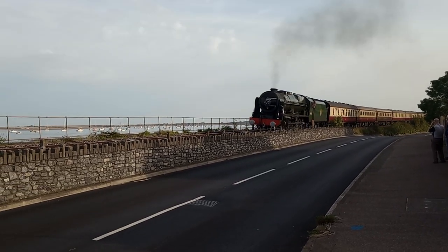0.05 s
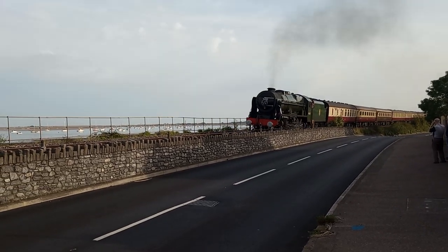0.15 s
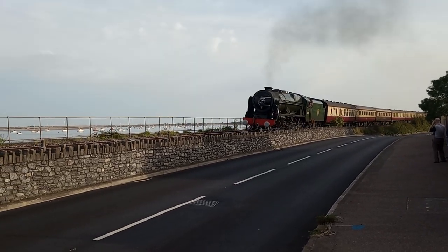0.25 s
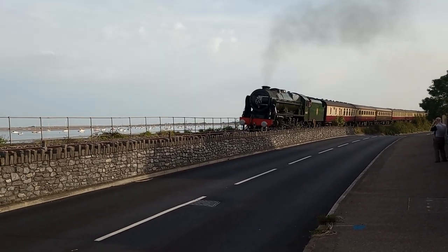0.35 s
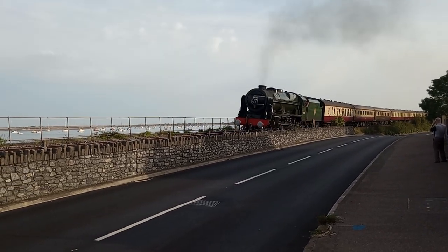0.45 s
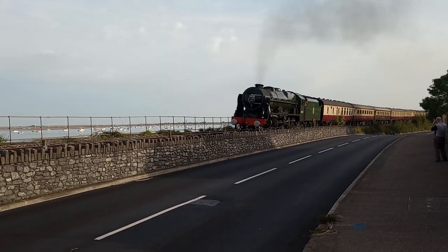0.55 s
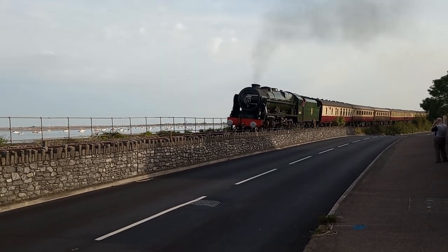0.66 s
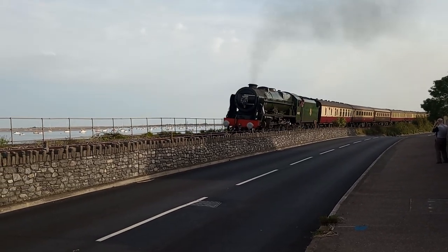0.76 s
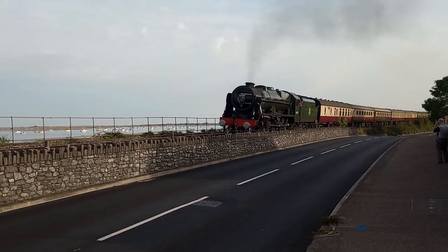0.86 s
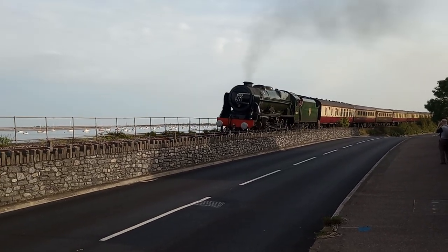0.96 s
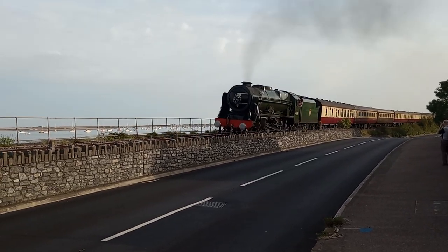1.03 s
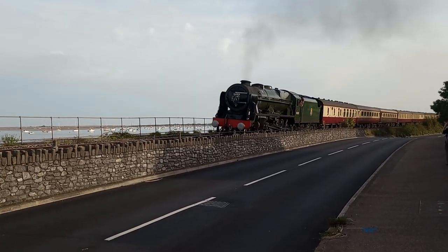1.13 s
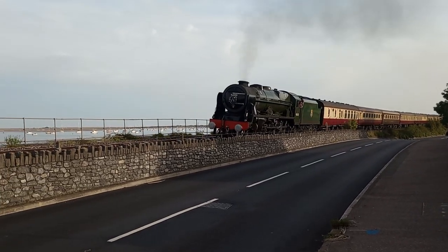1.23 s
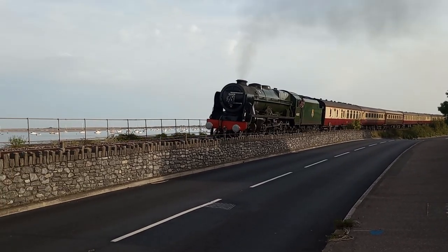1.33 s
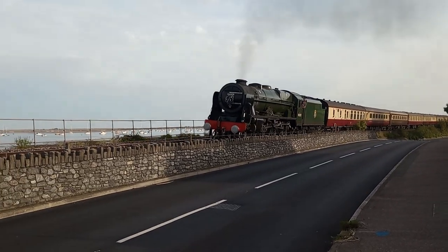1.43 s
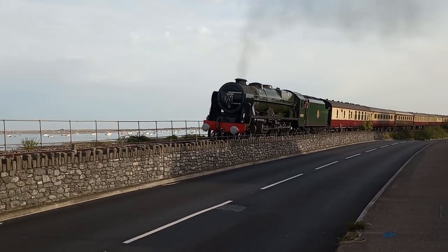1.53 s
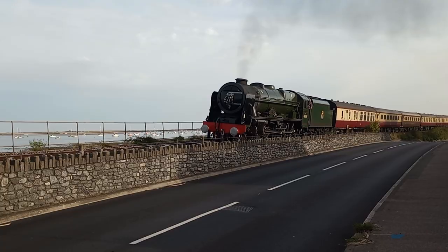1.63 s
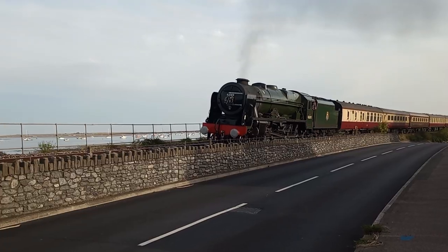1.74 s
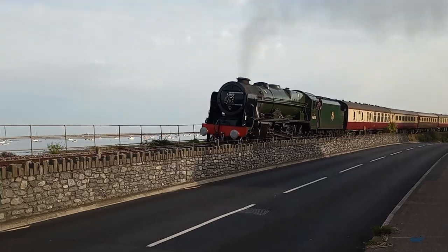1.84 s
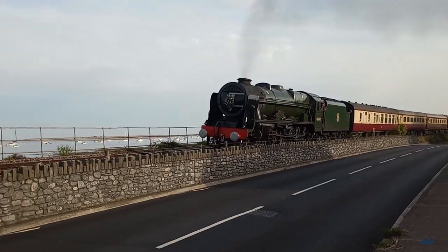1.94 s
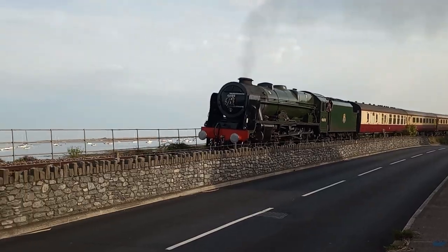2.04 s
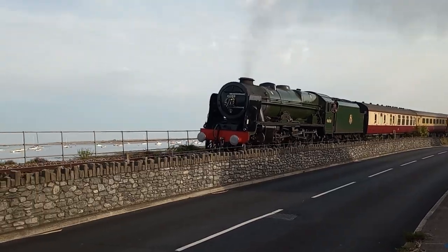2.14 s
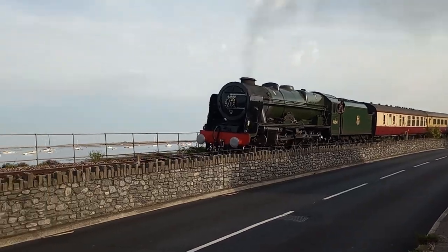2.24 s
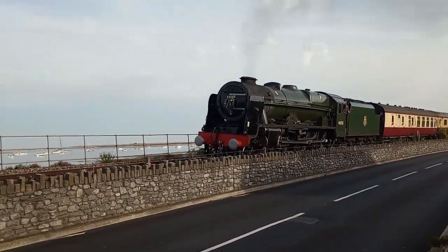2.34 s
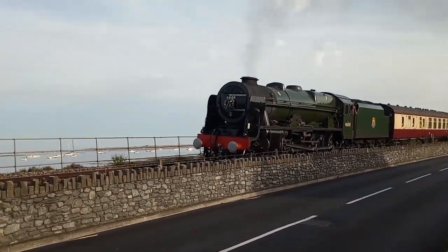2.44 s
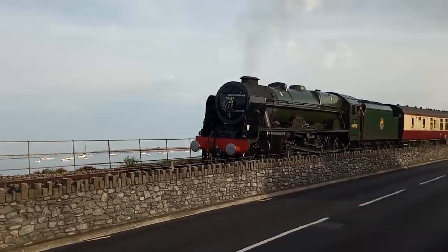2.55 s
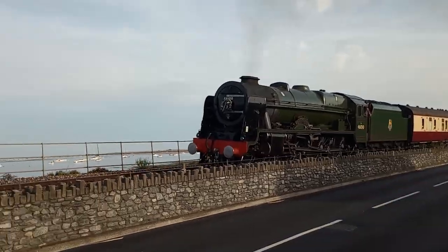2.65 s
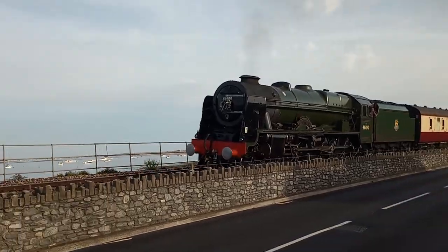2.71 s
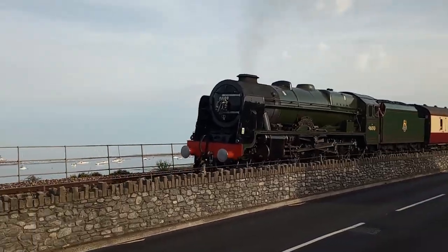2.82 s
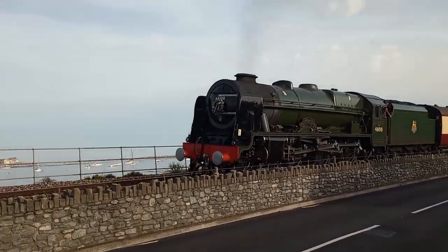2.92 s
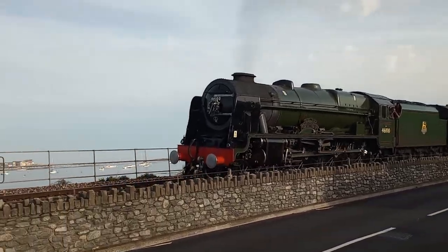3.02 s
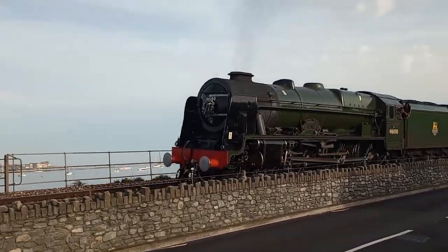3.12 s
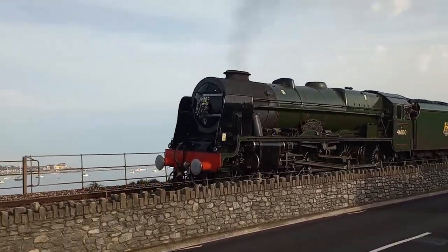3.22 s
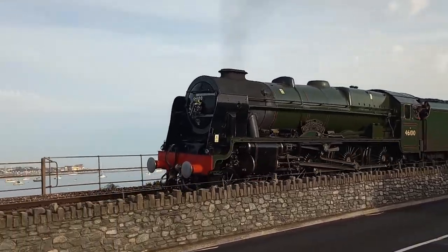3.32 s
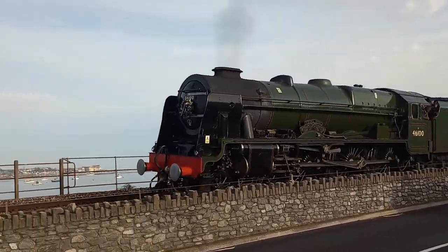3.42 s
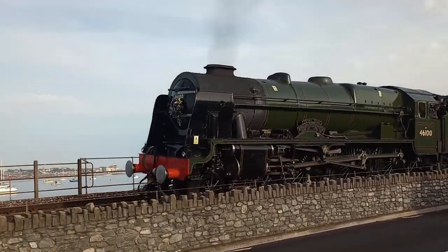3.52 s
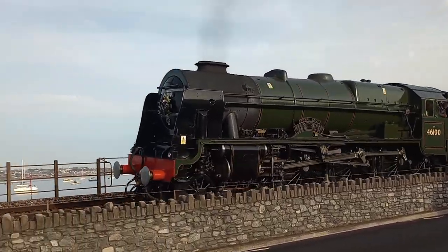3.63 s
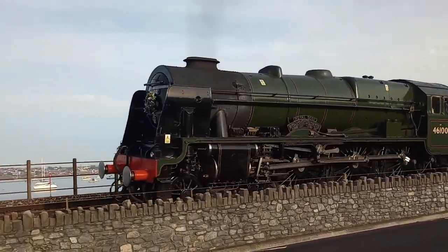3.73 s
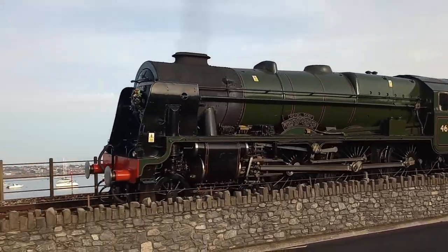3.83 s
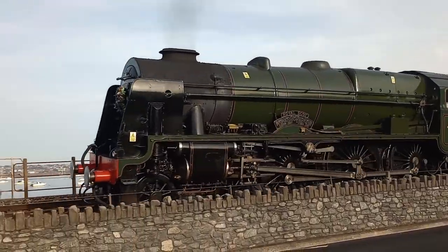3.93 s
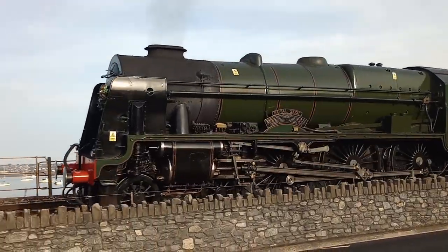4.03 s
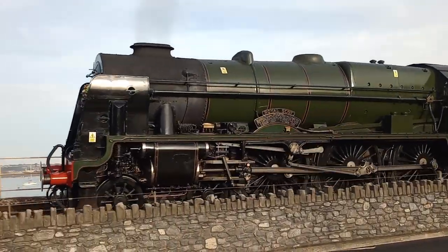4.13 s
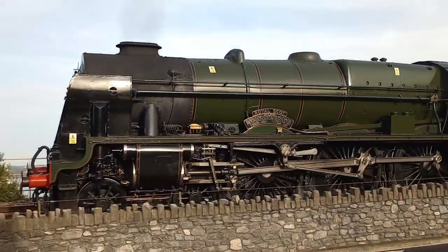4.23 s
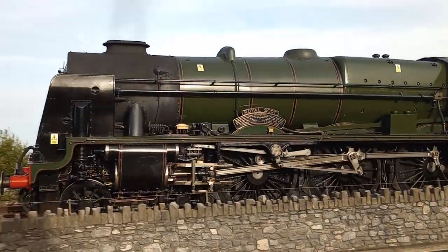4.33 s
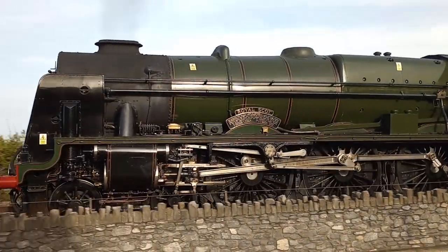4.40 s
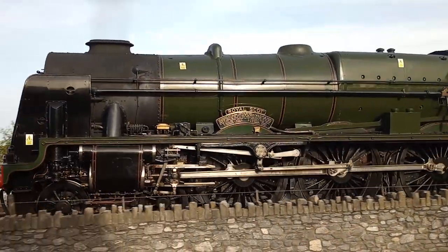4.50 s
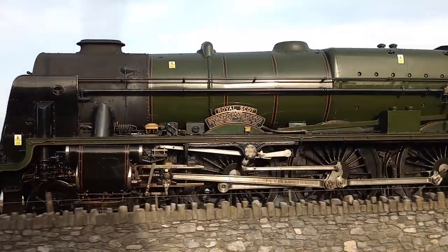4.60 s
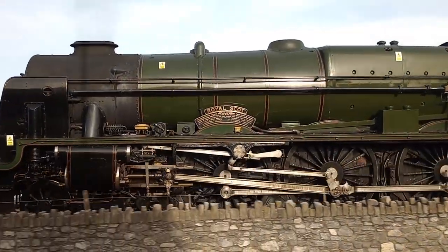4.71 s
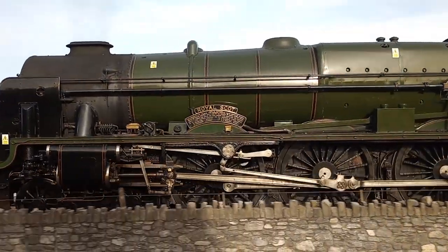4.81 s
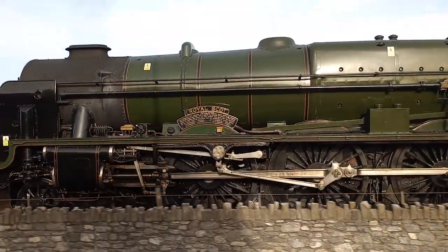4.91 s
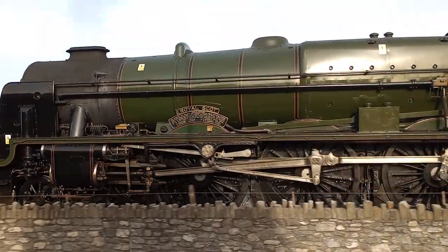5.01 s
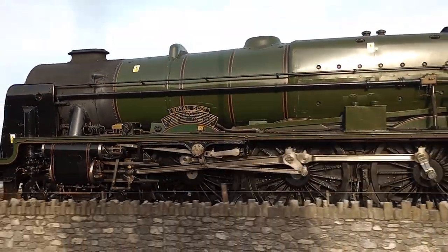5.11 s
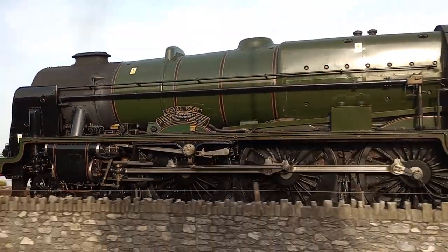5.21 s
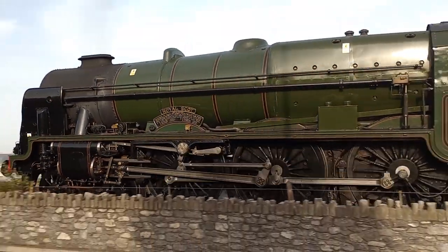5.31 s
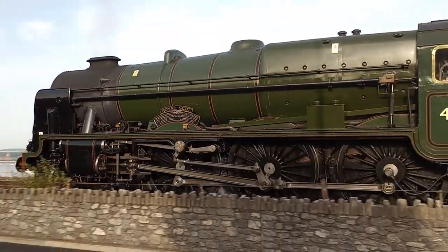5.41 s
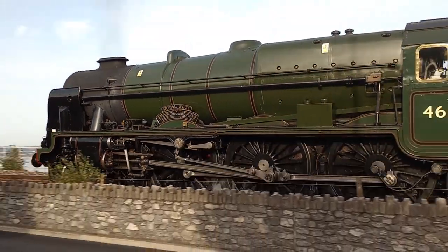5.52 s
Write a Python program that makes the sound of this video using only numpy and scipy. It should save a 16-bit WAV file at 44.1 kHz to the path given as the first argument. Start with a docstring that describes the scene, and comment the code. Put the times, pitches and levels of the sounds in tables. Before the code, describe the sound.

A steam locomotive approaches with rapid, booming chuffs and passes close by, with rumbling wheels and hissing steam.

```python
"""A steam locomotive on a sea wall, from a hand-held stereo microphone across the road, 13 m off the track.
At first it is some 65 m away: about eight exhaust beats a second roar out of the chimney and set it
booming, mirrored by the road and echoed by the land, over rumbling wheels and ringing rails.
Thin squeaks come in the first two seconds, and the hiss of leaking steam grows as the engine nears.
From about 4 s the wheels sing low tones; at 4.6 s the engine draws level, loud and side-on."""
import sys
import numpy as np
from scipy import signal
from scipy.fft import rfft, irfft
from scipy.io import wavfile
from scipy.ndimage import uniform_filter1d, map_coordinates

SR = 44100
rng = np.random.default_rng(int(sys.argv[2]) if len(sys.argv) > 2 else 0)


def waveform_to_disk(signal):
    """Save audio, clipped to [-1, 1], as 16-bit WAV at the path in sys.argv[1]."""
    frames = np.transpose(np.atleast_2d(signal))
    scaled = np.clip(frames, -1, 1) * 32767
    samples = np.round(scaled).astype(np.int16)
    wavfile.write(sys.argv[1], SR, samples)


N = 245195
TIME = np.arange(N) / SR
BINS = np.maximum(np.arange(N // 2 + 1) * SR / N, 1)
SPEED_M_S, DRAWS_LEVEL_S, TRACK_M, SOUND_M_S = 14, 4.6, 13, 343
CHIMNEY_HEIGHT_M, MIC_HEIGHT_M = 7.72, 1.621


def undb(db):
    """Decibels to gain."""
    return 10 ** (np.asarray(db) / 20)


def curves(rows, at=TIME):
    """Each column of a table, joined by straight lines in time."""
    s, *columns = np.transpose(rows)
    return [np.interp(at, s, column) for column in columns]


def colour(points, modes=()):
    """Gain at each frequency: a smooth spectrum lifted by resonances."""
    hz, db = np.transpose(points)
    lifts = sum(lift / (1 + (2 * (BINS - centre) / width) ** 2) for centre, width, lift in modes)
    return undb(np.interp(np.log(BINS), np.log(hz), db) + lifts)


# Stereo width at the microphone: f/Hz, side minus mid/dB
MIC_WIDTH = [(25, -55), (200, -18.5), (380, -12), (700, -10.5), (1300, -4), (2400, -5), (4400, -2),
             (9000, -1)]
def noise(gain, band=(0, SR)):
    """Coloured stereo noise, its mid at rms 1 within the band; the bass is alike, the treble wide."""
    mid, side = rfft(rng.standard_normal((2, N))) * gain
    rms = np.std(irfft(mid * (BINS > band[0]) * (BINS < band[1]), N))
    side = side * colour(MIC_WIDTH)
    return irfft(np.array([mid + side, mid - side]), N) / rms


def walk(rate):
    """Random levels held 1 / rate s and smoothed twice."""
    hold = max(int(SR / rate), 1)
    steps = np.repeat(rng.standard_normal(N)[:N // hold + 1], hold)
    return 0.9 * uniform_filter1d(uniform_filter1d(steps, hold), hold)[:N]


def puff(start, length, rise, droop, decay):
    """Envelope of one burst: it opens, sags and shuts; all times in seconds."""
    age = TIME - start
    opening = .5 + .5 * np.tanh(age / rise)
    return opening * np.exp(-np.maximum(age, 0) / droop - np.maximum(age - length, 0) / decay)


def delayed(sound, lag):
    """The sound heard a moving number of seconds late."""
    return map_coordinates(sound, [np.arange(N) - lag * SR], order=5)


def dulled(sound, hz):
    """The treble falls 6 dB an octave above hz."""
    return irfft(rfft(sound) / np.hypot(1, BINS / hz), N)


def rough_note(hz, width_hz, saturation):
    """A resonance of rms 1 whose size and phase are jostled by its drive."""
    drive = rfft(rng.standard_normal((2, N)))
    real, imaginary = irfft(drive / np.hypot(1, (BINS / width_hz) ** 4), N)
    swing = real + 1j * imaginary
    turns = np.cumsum(hz * np.ones(N)) / SR
    note = np.real(swing / np.abs(swing) ** saturation * np.exp(2j * np.pi * turns))
    return note / np.std(note)


def along(s):
    """Metres of track between the engine and the point opposite the microphone."""
    return SPEED_M_S * np.abs(s - DRAWS_LEVEL_S)


def distance(s):
    """Metres from the engine to the microphone."""
    return np.hypot(along(s), TRACK_M)


# Three cylinders, six beats a wheel turn: valve lateness/s, blast accent/dB, boom accent/dB, length factor
VALVE_TIMING = [(0.0023, 0.75, -1.3, 0.96), (-0.000017, -3, 1.5, 1.04), (0.00035, 0.5, -0.8, 0.95),
                (0.0071, 1.8, -0.4, 0.88), (-0.001, 0, 1, 0.92), (0.0064, 1.1, -0.5, 1.04)]
# Exhaust from across the road: t/s, blast level/dB, bark against blast/dB, beat length/s
EXHAUST_STRENGTH = [(0, -26.5, -38, 0.05), (.7, -25, -11.5, .076), (1.35, -24, -17.5, 0.087),
                    (2.15, -20, -40, 0.052), (2.9, -19.5, -12.5, 0.061), (3.3, -16.5, -13, 0.064),
                    (3.9, -17.3, -10.5, 0.053), (4.9, -18.5, -16, 0.077), (5.56, -18, -14, 0.074)]
def exhaust_beats(count=47, first_s=-.24, gap_s=.12958, quicken_s=.000212, scatter_db=0.69):
    """A limping, quickening beat as it reaches the microphone: t/s, blast/dB, length/s, boom/dB."""
    k = np.arange(count)
    late, accent_db, boom_accent_db, stretch = np.array(VALVE_TIMING)[k % len(VALVE_TIMING)].T
    leaves = first_s + k * gap_s - quicken_s * k ** 2 / 2 + late
    heard = leaves + distance(leaves) / SOUND_M_S
    blast_db, _, length = curves(EXHAUST_STRENGTH, heard)
    blast_db = blast_db + accent_db + scatter_db * rng.standard_normal(count)
    boom_db, _ = curves(CHIMNEY_NOTE, heard)
    return np.transpose([heard, blast_db, length * stretch, boom_db + boom_accent_db])


# Exhaust jet, head-on from up the line and side-on from across the road: f/Hz, relative level/dB
JET_HEAD_ON = [(20, -50), (50, -5), (90, -1.5), (150, 11.5), (260, -2.5), (500, 5), (800, -7), (1150, -6),
               (2000, -7), (3100, -11), (4200, -22), (6500, -31), (11000, -46)]
JET_SIDE_ON = [(20, -52), (115, -7), (180, 6.5), (300, 3), (450, 7), (750, 4), (1150, -7.5), (1800, -6.5),
               (3100, -11.5), (4200, -23), (6500, -31.5), (11000, -36)]
# Upper resonances of chimney and smokebox: f/Hz, width/Hz, lift/dB
CHIMNEY_MODES = [(914, 16, 8), (990, 85, 9.5), (1330, 310, 4), (1460, 170, 3), (1907, 150, 6),
                 (3880, 59, 2.5)]
# First rush of steam through the blast pipe: f/Hz, relative level/dB
BARK_SPECTRUM = [(300, -52), (1200, 9), (3000, 6), (5000, -8), (7000, -18), (14000, -25)]
def blast(beats, broadside, gain_db=2.0, rough_db=1.5, bark_gain_db=2.5):
    """Each beat barks and drives a turbulent jet up the chimney; its colour turns with the engine."""
    _, bark_db, _ = curves(EXHAUST_STRENGTH)
    flow = sum(undb(db) * puff(s + 0.0021, length, rise=0.018, droop=0.088, decay=0.03)
               for s, db, length, _ in beats)
    rush = sum(undb(db) * puff(s + 0.011, 0.035, rise=0.0039, droop=0.091, decay=0.0091)
               for s, db, *_ in beats)
    head_on = noise(colour(JET_HEAD_ON, CHIMNEY_MODES), band=(400, 4000))
    side_on = noise(colour(JET_SIDE_ON, CHIMNEY_MODES), band=(400, 4000))
    jet = flow * (np.sqrt(1 - broadside) * head_on + np.sqrt(broadside) * side_on)
    bark = rush * undb(bark_db + bark_gain_db) * noise(colour(BARK_SPECTRUM))
    return (jet + bark) * undb(gain_db + rough_db * walk(rate=260))


def through_plume(sound, gain=0.22, lag_s=.0045, sway=0.213, dull_hz=6000):
    """A second path through the billowing plume keeps shifting, so every beat has its own colour."""
    detour = lag_s * np.exp(sway * walk(rate=2.5))
    bent = np.array([delayed(channel, detour) for channel in dulled(sound, dull_hz)])
    return (sound + gain * bent) / np.hypot(1, gain)


# Reflections off boiler and sea wall: head-on lag/s, side-on lag/s, gain
BOILER_AND_WALL = [(.0023, 0.0031, -0.095), (.0092, .0074, 0.17)]
def reflected(sound, broadside):
    """Path lengths change as the engine moves, so ripples slide through the roar."""
    paths = [(far + (near - far) * broadside, gain) for far, near, gain in BOILER_AND_WALL]
    return sound + np.array([sum(gain * delayed(channel, lag) for lag, gain in paths) for channel in sound])


def over_road(sound, gain, dull_hz):
    """A dull bounce off the road joins in; its detour grows as the engine nears, so hollows sweep down."""
    direct_m = np.hypot(distance(TIME), CHIMNEY_HEIGHT_M - MIC_HEIGHT_M)
    bounce_m = np.hypot(distance(TIME), CHIMNEY_HEIGHT_M + MIC_HEIGHT_M)
    lag = (bounce_m - direct_m) / SOUND_M_S
    return sound + gain * np.array([delayed(channel, lag) for channel in dulled(sound, dull_hz)])


# Boom of the chimney at the microphone: t/s, level/dB, f/Hz
CHIMNEY_NOTE = [(0, -24.5, 244.6), (1.1, -24, 250), (1.8, -24.5, 232.8), (2.3, -28.5, 261),
                (2.75, -18.5, 296.1), (3.3, -16, 268), (4.1, -13.3, 220.2), (4.8, -12.5, 236.3),
                (5.56, -14, 249)]
def boom(beats):
    """The gas column in the chimney builds up after each beat and sounds a rough, saturating note."""
    _, hz = curves(CHIMNEY_NOTE)
    flow = sum(undb(db) * puff(s + 0.011, length, rise=0.014, droop=0.18, decay=0.043)
               for s, _, length, db in beats)
    return rough_note(hz, width_hz=46.6, saturation=0.41) * flow


def echo(sound, gain_db=-12.5, t60_s=0.46, delay_s=0.025, dull_hz=2200):
    """Walls, trees and the hillside scatter the exhaust back, late and dull."""
    tail = rng.standard_normal((2, N)) * undb(-60 * TIME / t60_s) * (TIME > delay_s)
    tail = dulled(tail / np.sqrt(np.sum(tail[0] ** 2)), dull_hz)[:, :SR]
    mid, side = signal.fftconvolve(sound.mean(axis=0)[None], tail, axes=1)[:, :N]
    side = irfft(rfft(side) * colour(MIC_WIDTH), N)
    return undb(gain_db) * np.array([mid + side, mid - side])


# Wheels rolling on the rails: f/Hz, relative level/dB
RAIL_SPECTRUM = [(150, -3.5), (300, 11), (600, 0.5), (850, -10), (1300, -10.5), (2000, -3.5), (2800, -10.5),
                 (4000, -16.5), (7000, -30.5)]
# Ringing of wheels and rails: f/Hz, width/Hz, lift/dB
RAIL_RINGING = [(700, 160, 10.5), (968, 25, 2), (1069, 27, 13), (1615, 87, 7)]
# Low rumble of the running gear: f/Hz, relative level/dB
RUMBLE_SPECTRUM = [(20, -46), (32, -27), (45, -4), (75, 13), (130, 12.5), (200, -2), (400, -48)]
# That rumble at the microphone: t/s, level/dB
RUMBLE_APPROACH = [(0, -38.5), (1.3, -36.5), (2.1, -36), (2.9, -30), (3.8, -34), (4.3, -31.5), (5.56, -30)]
def wheels(rail_db=-24.0, fall_db=6.0, flutter_db=3.0):
    """Rough treads shake the frames and ring the rails; the ring fades with each doubling of distance."""
    rumble_db, = curves(RUMBLE_APPROACH)
    doublings = np.log2(distance(TIME) / TRACK_M)
    rails = noise(colour(RAIL_SPECTRUM, RAIL_RINGING))
    rails *= undb(rail_db - fall_db * doublings + flutter_db * walk(rate=35))
    return rails + noise(colour(RUMBLE_SPECTRUM)) * undb(rumble_db)


# Leaking steam, and the thin sizzle of the cylinder glands: f/Hz, relative level/dB
HISS_SPECTRUM = [(2000, 14), (4500, 7), (7500, 7), (9300, 4), (11000, -4), (13000, -8), (15500, 0)]
GLAND_SPECTRUM = [(8000, -30), (11500, -11), (13500, -3), (15300, -1), (17000, -8)]
# The leak, loudest as the cylinders come towards the microphone: t/s, level/dB
LEAK_LEVEL = [(0, -72), (1.3, -58), (2.2, -55), (3, -55.5), (3.75, -46.5), (4.1, -49.5), (5.56, -48)]
def steam(beats, broadside, gain_db=-3.5, sizzle_db=4.0, uneven=0.086, pan_db=-2.5):
    """Steam leaks and surges unevenly with every stroke; the sizzle grows as the engine nears."""
    hiss_db, = curves(LEAK_LEVEL)
    sizes = np.exp(uneven * rng.standard_normal(len(beats)))
    strokes = sum(size * puff(s, length, rise=0.0051, droop=0.11, decay=.016)
                  for size, (s, _, length, _) in zip(sizes, beats))
    hiss = noise(colour(HISS_SPECTRUM), band=(9000, SR))
    sizzle = undb(sizzle_db) * np.sqrt(broadside) * noise(colour(GLAND_SPECTRUM))
    pan = undb(pan_db * broadside ** .25 * np.array([[1], [-1]]) / 2)  # a little to the right
    return (hiss + sizzle) * pan * (1 + strokes) * undb(hiss_db + gain_db)


# Squeaks and ringing of wheels and rods: t/s, length/s, f/Hz, width/Hz, level/dB
STEEL_SQUEALS = [(.43, .13, 9678, 14, -66), (1.244, 0.038, 4500, 160, -51), (1.51, .035, 4480, 160, -50),
                 (1.6, .035, 4530, 180, -48), (1.733, 0.033, 4580, 180, -48), (3.899, .07, 660, 35, -25),
                 (4.23, 0.14, 710, 35, -24), (4.97, .12, 700, 45, -25), (5.37, .05, 1160, 110, -28),
                 (5.406, .06, 1012, 110, -26.5)]
def squeals():
    """Rubbing steel sings briefly: thin squeaks from afar, low wheel tones close by."""
    return sum(rough_note(hz, width, saturation=0.47) * undb(db)
               * puff(s, length, rise=0.0058, droop=1.0, decay=0.019)
               for s, length, hz, width, db in STEEL_SQUEALS)


# Delay of the microphone's left side behind its right: t/s, lag/s
LEFT_LAG = [(0, .00005), (3.2, .00004), (4.2, -.00005), (5.56, -.00011)]
def scene(head_on_m=71.4):
    """Exhaust, echo, running gear and steam reach left and right a moment apart; squeals sit centre."""
    beats = exhaust_beats()
    broadside = np.clip(1 - along(TIME) / head_on_m, 0, 1)  # 0 head-on, 1 level with the microphone
    roar = reflected(through_plume(blast(beats, broadside)), broadside)
    exhaust = over_road(roar, gain=0.28, dull_hz=1500) + boom(beats)
    gear = over_road(wheels(), gain=0.18, dull_hz=1200)
    left, right = exhaust + echo(exhaust) + gear + steam(beats, broadside)
    left_lag, = curves(LEFT_LAG)
    return np.array([delayed(left, left_lag), right]) + squeals()


def record(dry, ceiling=.85, low_cut_hz=38, top_hz=15780):
    """The hand-held recorder rounds the highest peaks and cuts the deepest bass and the top."""
    rounded = dry / (1 + (dry / ceiling) ** 6) ** (1 / 6)
    lean = signal.sosfilt(signal.butter(4, low_cut_hz, "high", fs=SR, output="sos"), rounded)
    return signal.sosfilt(signal.ellip(12, .2, 80, top_hz, fs=SR, output="sos"), lean)


dry = scene()
out = record(dry)
waveform_to_disk(out)
```